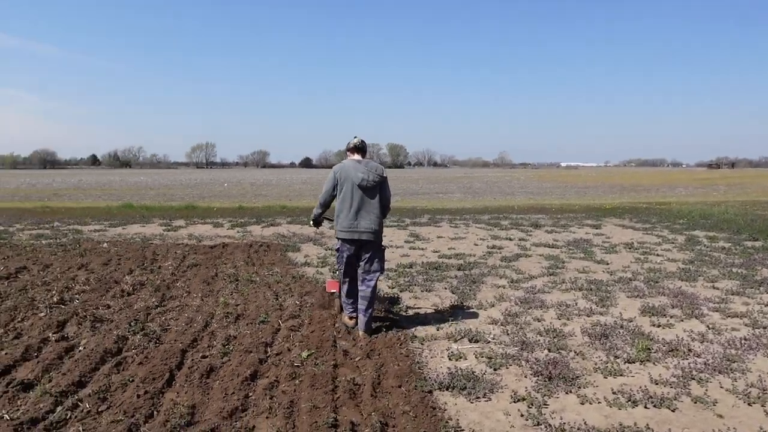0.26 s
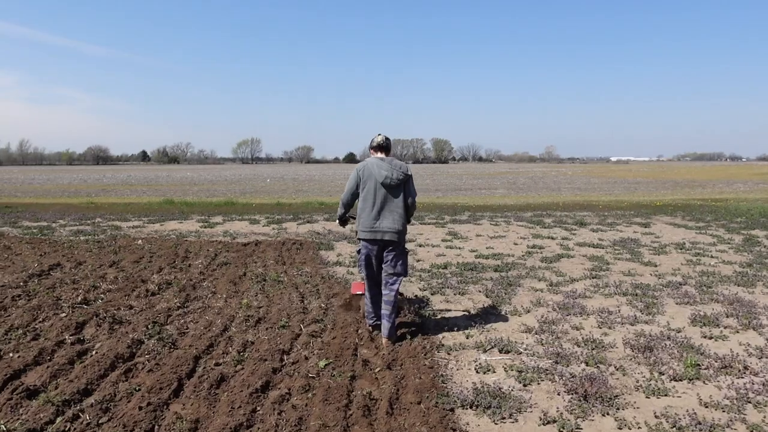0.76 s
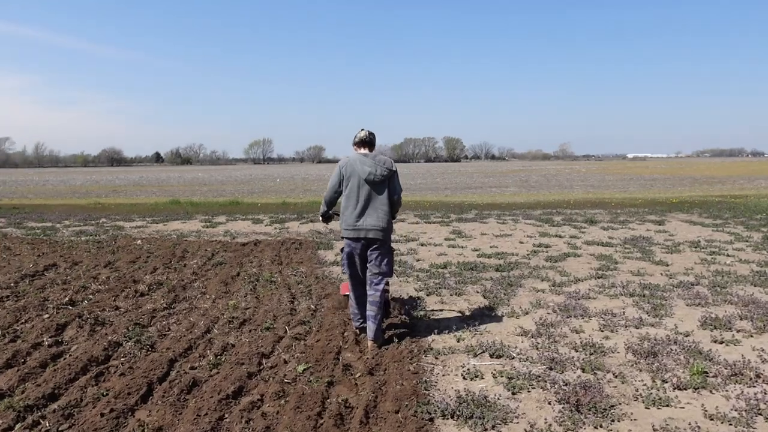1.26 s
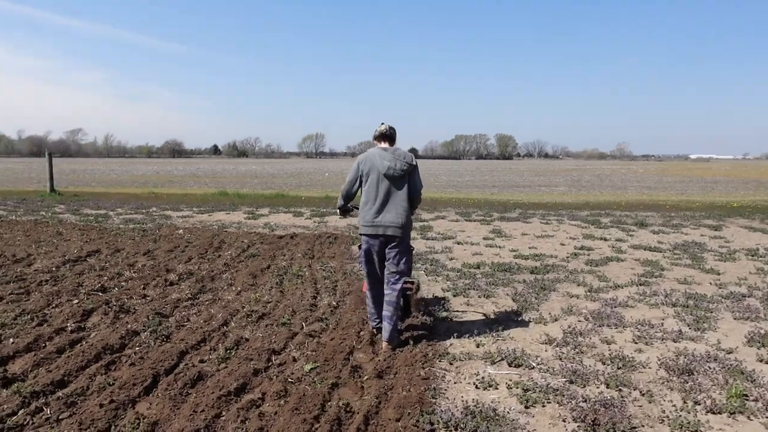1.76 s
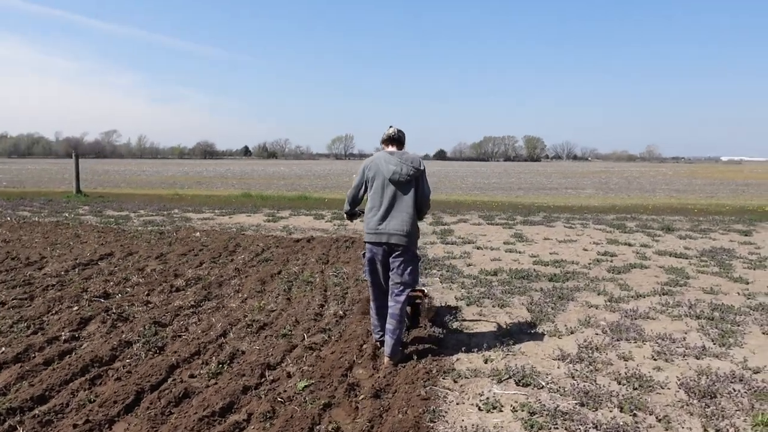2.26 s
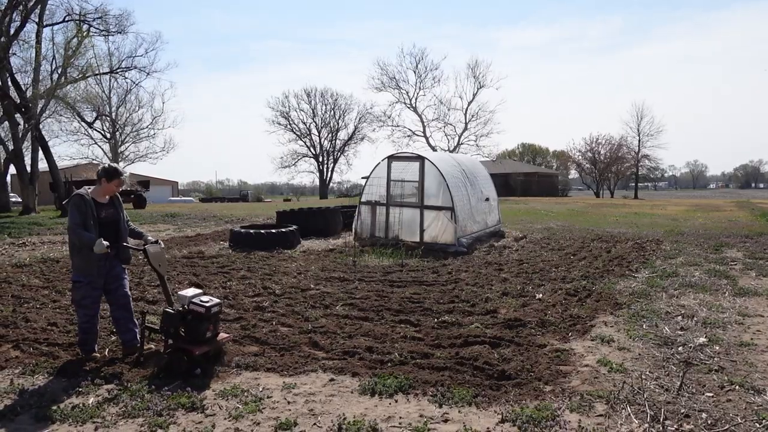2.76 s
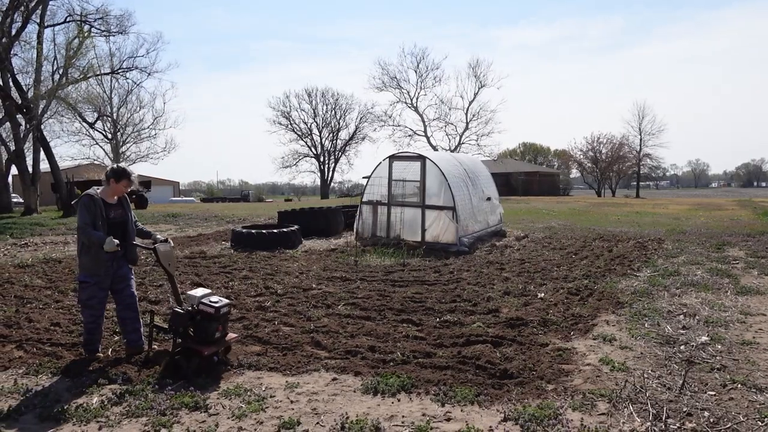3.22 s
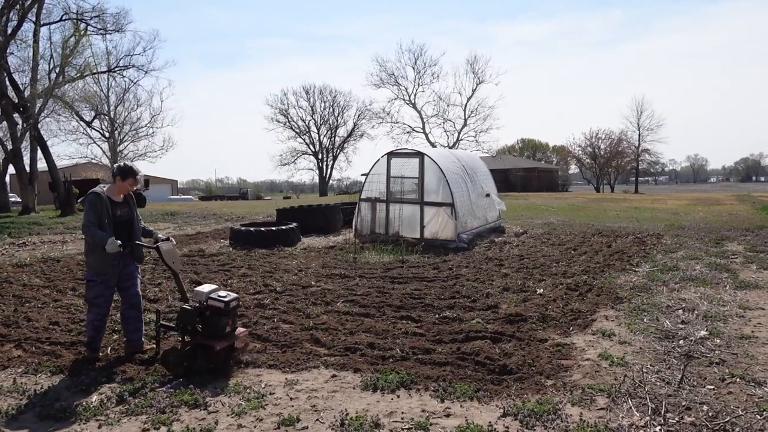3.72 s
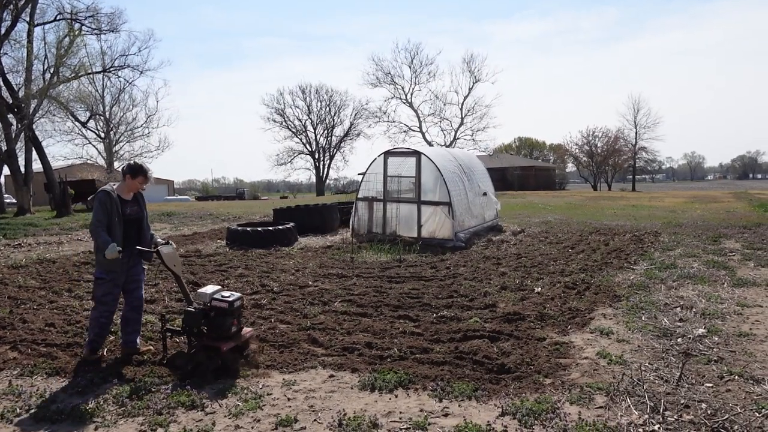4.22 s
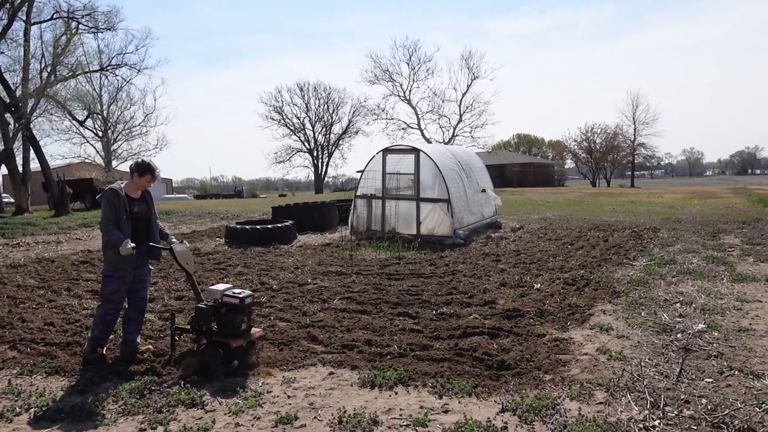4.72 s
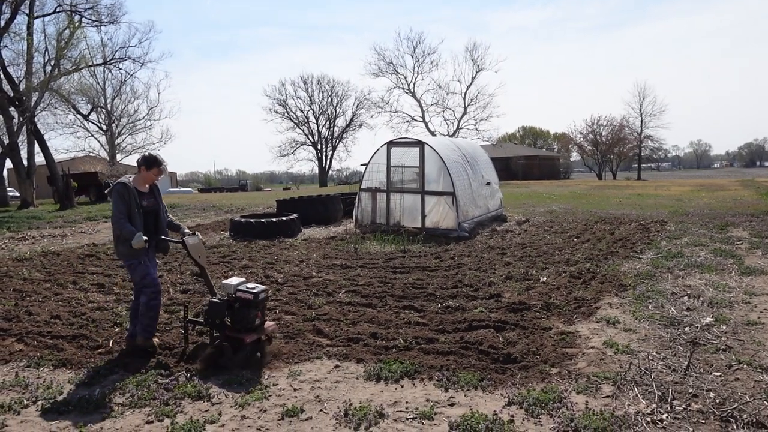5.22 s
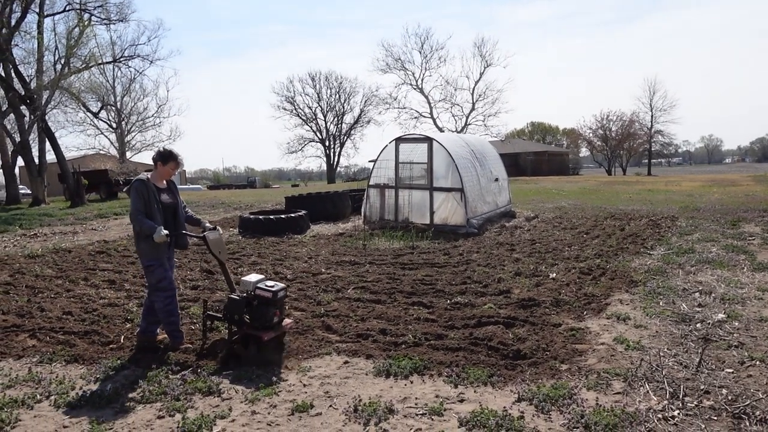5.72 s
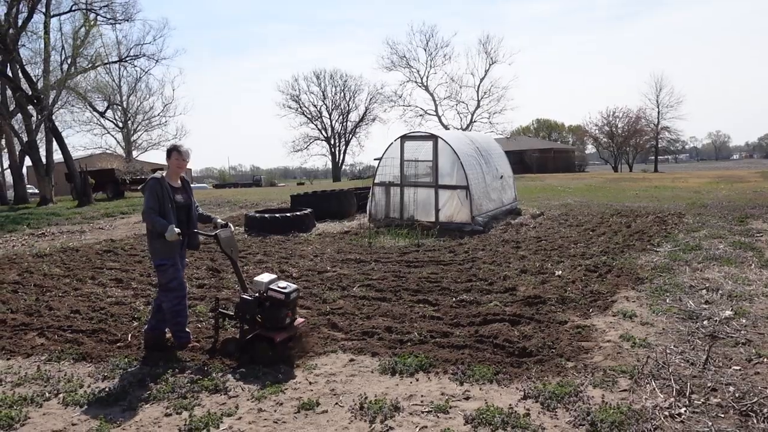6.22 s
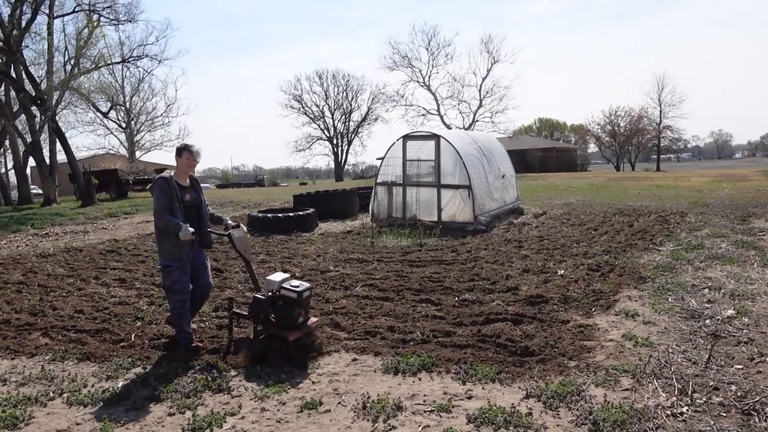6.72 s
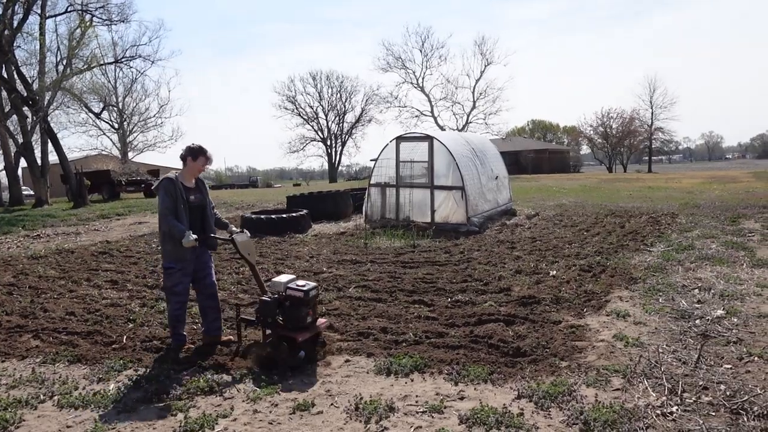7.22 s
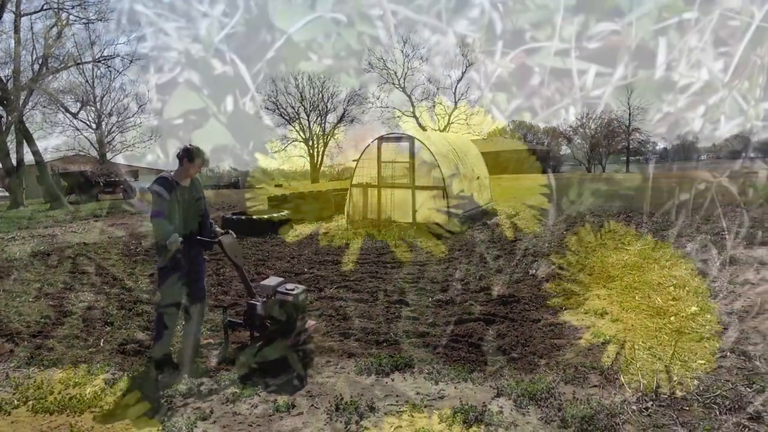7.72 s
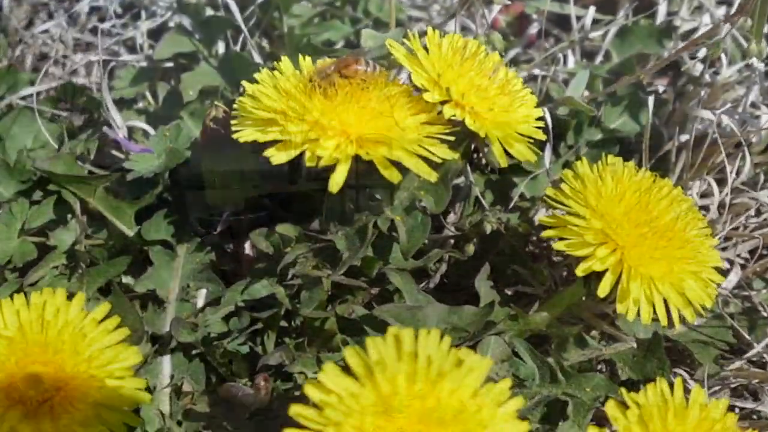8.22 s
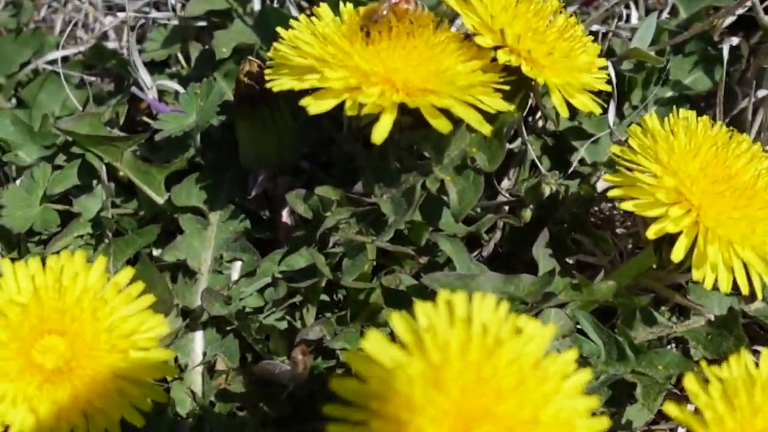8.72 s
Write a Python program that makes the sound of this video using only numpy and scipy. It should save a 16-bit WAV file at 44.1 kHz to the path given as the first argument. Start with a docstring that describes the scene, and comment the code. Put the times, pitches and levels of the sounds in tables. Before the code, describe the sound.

From the first moment a small single-cylinder four-stroke tiller is already running outdoors, heard from several metres away. Its exhaust thumps about twenty-four times a second, a dry, quick putter over dull ground rumble, with ringing metal casing and a subdued hiss. Small misfires near 0.2, 0.7 and 1.0 seconds make it stumble and the speed swing slightly. From about 1.1 seconds it fades, gone by 2.5. It then rises rapidly, full by 3.0 seconds, from a nearer microphone: louder, brighter, with more hiss, chain and valve ticking, gritty knocks and loose-part rattle. It runs steadily, leaning slightly left, with occasional hiccups around 3.1, 3.9, 5.1 and 6.2 seconds and more frequent ones from 7 seconds. From about 7.5 seconds it fades smoothly, reaching complete silence at 8.4, which lasts to the end.

```python
"""A small engine's quick thumping comes first, with clatter and hiss: a single-cylinder four-stroke tiller in soil.
It is heard from farther off, fades out, fades in from nearer and fades out again, and silence ends the scene.
Each firing rings the muffler; now and then it misfires, and the governor lets the speed swing and settle.
Knocks ring the casing, valve ticks and chain links shape the hiss in step with the crank,
and grit, loose parts and a dull rumble add sounds that do not follow the crank."""
import sys
import numpy as np
from scipy import signal
from scipy.fft import rfft, irfft, next_fast_len
from scipy.io import wavfile
from scipy.ndimage import uniform_filter1d

SR = 44100
rng = np.random.default_rng(int(sys.argv[2]) if len(sys.argv) > 2 else 0)


def put_to_file(sound):
    """Save the sound as 16-bit audio at rate SR, in the file named by the first command-line argument."""
    columns = np.atleast_2d(sound).T  # one column per channel
    safe = np.clip(columns, -1, 1)
    whole_steps = np.round(safe * 32767)
    wavfile.write(sys.argv[1], SR, whole_steps.astype(np.int16))


N = 395577

CUT_S, END_S = 2.5, 8.431   # where the near passage starts and ends
FADE_IN_END_S, FADE_IN_DB_PER_S = 2.984, 123
# Pairs give the far passage, then the near one.
FADE_OUT_S = (1.42, 0.91)
FIRST_BLOWDOWN_S = (.0459, 2.5593)   # a moment at which the exhaust valve opens
BARK_DB = (-19, -19.5)
LINK_DB, GUARD_DB = (-3.5, -4.5), (-10.5, -15)   # chain link clicks, and chain guard against the other treble

GOVERNED_RPM = 2837.6
HUNT_PER_S, HUNT_DECAY_S = 2.168, .338   # swings per second; time for a swing to shrink to 37 percent

MUFFLER_LOW_CUT_HZ, CASING_LOW_CUT_HZ = 109.5, 435
EXHAUST_LOW_CUT_HZ = 55   # thins the deepest part of the exhaust thump
BLOWDOWN_RISE_HZ = 100   # softens the start of each push
# Delays count from the opening of the exhaust valve.
BARK_DELAY_MS, EARLY_PUFF_MS, POP_DELAY_MS = 2.87, 6, 15.6
PUFF_LOW_HZ, PUFF_HIGH_HZ = 75.3, 260
POP_LOW_HZ, POP_HIGH_HZ, POP_DB = 151, 306.4, 0.5   # the strength is that of an ordinary pop

LINKS_PER_CYCLE, LINK_PATCHY_DB = 5.44, 2   # links per two crank turns; slow unevenness of the clicks
PEAK_TOP, CUTOFF_HZ = 0.21, 15730   # height where peaks flatten; top of the treble

# Misfires of the engine. Each row: time in seconds, blowdown in dB, early puff in dB, pop in dB,
# speed lost in rpm (negative means gained).
ENGINE_MISFIRES = [(0.172, -7, 6, 11.5, -22.5), (.722, -2.5, -19, 0, 116), (1.019, -14, 11, 11.5, 111),
                   (1.48, -7, -11, -4, 39), (3.149, -5, -14, 6, 92.5), (3.916, -14, -8, 7.5, 63.5),
                   (5.142, -18.5, 12, 9.5, 31.5), (6.157, -9, -10.5, 5.5, 96.5),
                   (6.96, -2.5, -9.5, 2.5, 93), (7.341, -15, 13.5, 9, 149.5), (7.598, -10, -6, 7.5, 10.5),
                   (8.187, -15, -14, 5, 85.5)]


def from_db(db):
    """Turn decibels into gain."""
    return 10 ** (np.asarray(db) / 20)


def rms_one(x):
    """Scale a sound to an rms level of 1."""
    return x / np.sqrt(np.mean(x ** 2) + 1e-20)


def in_time(rows, t):
    """Read each column of a table as a curve at times t."""
    seconds, *columns = np.transpose(rows)
    return [np.interp(t, seconds, column) for column in columns]


def filtered(x, order, hz, kind):
    """Keep the low, high or middle pitches, as a smooth Butterworth filter does."""
    return signal.sosfilt(signal.butter(order, hz, kind, fs=SR, output="sos"), x)


def colour(x, spectrum, peaks=()):
    """Give x a spectrum with narrow bumps or dips, using a filter that never looks ahead; rms 1."""
    hz = np.linspace(1, SR / 2, 4097)
    at, db = np.transpose(spectrum)
    shape_db = np.interp(np.log(hz), np.log(at), db, left=-80)
    shape_db = uniform_filter1d(shape_db, size=9)
    for centre, width, rise_db in peaks:
        shape_db = shape_db + rise_db / (1 + (2 * (hz - centre) / width) ** 2)
    # Folding the cepstrum puts the filter's energy as early as possible (minimum phase).
    cepstrum = irfft(np.log(from_db(shape_db)))
    cepstrum[1:4096] = 2 * cepstrum[1:4096]
    cepstrum[4097:] = 0
    response = irfft(np.exp(rfft(cepstrum)))
    return rms_one(signal.oaconvolve(x, response)[:len(x)])


def ring(x, hz, t60):
    """Let clicks ring like struck metal: a unit click starts a sine of height 1 that falls 60 dB in t60 seconds."""
    r, w = from_db(-60 / (t60 * SR)), 2 * np.pi * hz / SR
    # The tiny offset keeps the fading numbers from becoming too small to compute quickly.
    return signal.lfilter([0, np.sin(w)], [1, -2 * r * np.cos(w), r * r], x + 1e-18)


def opposed_rings(x, modes):
    """Add up ringing modes, each in opposite phase to its neighbours."""
    return sum((-1) ** k * from_db(db) * ring(x, hz, t60) for k, (hz, db, t60) in enumerate(modes))


def clicks(count, at, sizes):
    """Make a train of one-sample clicks."""
    out, inside = np.zeros(count), (at >= 0) & (at < count)
    np.add.at(out, at[inside], sizes[inside])
    return out


def drift(count, rate):
    """Wander at random, no faster than about rate in Hz, with rms 1."""
    return rms_one(filtered(rng.standard_normal(count), 2, rate, "low"))


def crank_rpm(t):
    """Governed speed: each misfire or jolt knocks it off and a damped swing brings it back."""
    # The tines bite into hard soil or break free.
    # Each row: time in seconds, speed lost in rpm (negative means gained).
    jolts = [(-.204, 269), (1.367, -99), (1.95, -46), (2.506, -98), (3.312, 170), (3.674, 83), (4.561, 65),
             (4.786, 72), (4.962, -58), (5.495, -56)]
    upsets = jolts + [(row[0], row[-1]) for row in ENGINE_MISFIRES]
    rpm = np.full(len(t), GOVERNED_RPM)
    for s, lost_rpm in upsets:
        if (s < CUT_S) == (t[0] < CUT_S):   # each passage has its own upsets
            since = np.maximum(t - s, 0)
            swing = np.exp(-since / HUNT_DECAY_S) * np.cos(2 * np.pi * HUNT_PER_S * since)
            rpm -= (t >= s) * lost_rpm * swing
    return rpm


def exhaust(t, cycles, bark_db):
    """Every second turn gas bursts into the muffler and the rising piston pops after it;
    a misfire weakens the burst, adds a dull puff and changes the pop."""
    # Muffler modes. Each row: pitch in Hz, relative level in dB, time to fall 60 dB in seconds.
    muffler_modes = [(125.8, -2, 0.034), (213, 3.5, 0.047), (286.7, -12.5, 0.2)]
    # Upper muffler modes that bark at each blowdown.
    # Each row: pitch in Hz, relative level in dB, time to fall 60 dB in seconds.
    bark_modes = [(344, -5.5, 0.018), (443, 7.5, 0.021), (557, 7.5, 0.048), (774, -10, 0.035)]
    count = len(t)
    at = np.flatnonzero(np.diff(np.floor(cycles)))   # the exhaust valve opens
    strength_db, pop_db = np.zeros(len(at)), np.full(len(at), POP_DB)
    puff_db = np.full(len(at), -np.inf)   # no puff unless it misfires
    for s, *levels_db, _ in ENGINE_MISFIRES:
        if t[0] <= s < t[-1]:
            k = np.argmin(abs(t[at] - s))
            strength_db[k], puff_db[k], pop_db[k] = levels_db

    push = filtered(clicks(count, at, from_db(strength_db)), 2, BLOWDOWN_RISE_HZ, "low")
    thumps = filtered(opposed_rings(push, muffler_modes), 4, MUFFLER_LOW_CUT_HZ, "high")

    puffs = clicks(count, at + int(EARLY_PUFF_MS * SR / 1000), from_db(puff_db))
    puffs = filtered(puffs + 1e-18, 2, [PUFF_LOW_HZ, PUFF_HIGH_HZ], "band")
    pops = clicks(count, at + int(POP_DELAY_MS * SR / 1000), -from_db(pop_db))
    pops = filtered(pops + 1e-18, 2, [POP_LOW_HZ, POP_HIGH_HZ], "band")

    crack = clicks(count, at + int(BARK_DELAY_MS * SR / 1000), from_db(strength_db))
    bark = opposed_rings(crack, bark_modes)
    whole = rms_one(thumps) + from_db(37.0) * (puffs + pops) + from_db(bark_db) * rms_one(bark)
    return filtered(whole, 2, EXHAUST_LOW_CUT_HZ, "high")


def rumble(count):
    """Dull rumble of tines and ground: steady noise coloured low."""
    # Colour of the rumble. Each row: pitch in Hz, relative level per Hz in dB.
    rumble_colour = [(25, -42), (50, -26), (80, -12), (130, 0), (250, 0), (350, -8), (420, -80)]
    return from_db(-16.5) * colour(rng.standard_normal(count), rumble_colour)


def contacts(cycles, table, slack_deg, uneven_db):
    """Find when parts meet, a little early or late, and how hard: slack makes the timing uneven, and a separate
    unevenness varies the strength."""
    degrees, db = np.transpose(table)
    turn = np.arange(np.floor(cycles[0]) - 1, cycles[-1])[:, None]   # whole 720-degree cycles
    slack = slack_deg * rng.standard_normal((len(turn), len(degrees)))
    place = turn + (degrees + slack) / 720
    at = np.interp(place, cycles, np.arange(len(cycles)), left=-1, right=-1).astype(int)
    sizes = from_db(db + uneven_db * rng.uniform(-0.91, 1, place.shape))
    return at.ravel(), sizes.ravel()


def shaken(count, at, sizes, t60, depth):
    """Noise that swells at each contact and dies away, over a steady part."""
    burst = signal.lfilter([1], [1, -from_db(-60 / (t60 * SR))], clicks(count, at, sizes))
    return (1 + depth * burst) * rng.standard_normal(count)


def casing(count, at, knocks, k):
    """Knocks and shaking ring the casing's modes, over a broad roar that throbs with them."""
    # Casing and sheet-metal modes.
    # Each row: pitch in Hz, relative level in dB, time to fall 60 dB in seconds.
    casing_modes = [(745, -3, 0.1), (854.4, -3.5, 0.14), (947, -8.5, 0.16), (992, -7, 0.082),
                    (1046, -1.5, 0.12), (1083, 0, 0.081), (1163, 3, 0.071), (1205, -7, 0.096),
                    (1310, 1, 0.055), (1450, 0, 0.05), (1625, -6.5, 0.063)]
    # Colour of the roar, far and near. Each row: pitch in Hz, relative level per Hz in dB.
    roar_colours = ([(180, -37), (300, -1.5), (366, -15), (580, -15), (741, -8), (1090, -2.5), (1780, -12),
                    (2210, -9.5), (2600, -17.5), (3380, -22.5), (5720, -120)], [(180, -17), (300, -14.5),
                    (353, -13), (493, -13), (714, -9), (903, -7), (1050, -1), (1780, -10.5), (2600, -19.5),
                    (3380, -20), (5720, -120)])
    struck = shaken(count, at, knocks, t60=0.014, depth=1.0) + from_db(26.0) * clicks(count, at, knocks)
    # The level of each mode wanders slowly.
    rings = sum(from_db(db + 1.0 * drift(count, 5.6)) * ring(struck, hz, t60) for hz, db, t60 in casing_modes)
    rings = filtered(rings, 2, CASING_LOW_CUT_HZ, "high")
    roar = colour(shaken(count, at, knocks, t60=0.027, depth=0.93), roar_colours[k])
    return rms_one(from_db(-2.5) * rms_one(rings) + roar)


def links(cycles, level_db):
    """Chain links drop onto the sprocket in step with the crank: when, and how hard."""
    at = np.flatnonzero(np.diff(np.floor(cycles * LINKS_PER_CYCLE)))
    patchy_db = LINK_PATCHY_DB * drift(len(cycles), 6)[at]
    return at, from_db(level_db + patchy_db + 3.0 * rng.standard_normal(len(at)))


def grit(count, per_s, spread_db):
    """Small hard knocks, as of soil and stones on metal: random clicks of very uneven size."""
    sizes = from_db(spread_db * np.minimum(rng.exponential(1, count), 5)) * rng.choice([-1, 1], count)
    return rms_one(sizes * (rng.random(count) < per_s / SR))


def rattle(count, spectrum, bumps, per_s, t60):
    """Many small loose parts, knocked at random; each pings at its own pitch and comes and goes on its own."""
    knocks = grit(count, per_s, 3.4)
    pitches = np.geomspace(1900, 15000, num=44)
    dealt = rng.integers(0, 44, count)   # which part each knock hits
    looseness_db = 4 * uniform_filter1d(rng.standard_normal((44, count // 2000 + 1)), size=3)
    pings = np.zeros(count)
    for k, hz in enumerate(pitches):
        looseness = from_db(np.repeat(looseness_db[k], repeats=2000)[:count])
        pings += ring(knocks * (dealt == k) * looseness, hz, t60) * np.sqrt(hz)
    return colour(pings, spectrum, bumps)


def treble(count, at, ticks, k):
    """Fan and exhaust hiss swells with valve and chain clicks, grit joins in, and loose parts rattle."""
    # Colour of the hiss, far and near. Each row: pitch in Hz, relative level per Hz in dB.
    hiss_colours = ([(1060, -21), (1800, -10.5), (2220, -4), (2800, -0.5), (3420, -1.5), (4170, -3),
                    (5520, -3), (6200, -9), (7370, -13.5), (9840, -15), (15600, -34)], [(1060, -19),
                    (1800, -4.5), (2300, 0), (2750, -4), (3330, 0), (4360, -4), (4770, -5), (6090, -7.5),
                    (6790, -11), (11800, -23), (15600, -33.5)])
    # Narrow bumps and dips in the colour of the hiss, far and near.
    # Each row: pitch in Hz, width in Hz, rise in dB (negative is a dip).
    hiss_bumps = ([(3360, 180, 6.5), (3820, 80, 5.5), (5200, 170, -5.5), (5830, 84, 0.5),
                  (8640, 140, -1.5)], [(3340, 250, -2), (3820, 170, 1), (4820, 250, 5), (5450, 130, 2.5),
                  (5870, 92, -4.5)])
    source = rms_one(shaken(count, at, ticks, t60=0.019, depth=2.6)) + from_db(-12) * grit(count, 1200, 4.2)
    top = filtered(source, 4, 6500, "high")
    # The top of the treble flickers on its own.
    source = source * from_db(0.5 * drift(count, 8.4)) + top * (from_db(2.0 * drift(count, 25)) - 1)
    hiss = colour(source, hiss_colours[k], hiss_bumps[k])
    loose = rattle(count, hiss_colours[k], hiss_bumps[k], per_s=1300.0, t60=.03)
    return rms_one(hiss + from_db(-5) * loose)


def guard(count, at, sizes):
    """Each link rings the chain guard, every mode with a chance strength of its own."""
    # Chain guard modes. Each row: pitch in Hz, relative level in dB, time to fall 60 dB in seconds.
    guard_modes = [(4860, -9, 0.016), (5440, 5, 0.021), (6060, 5, 0.03)]
    shape = (len(at), len(guard_modes))
    chance = rng.uniform(0.48, 1, shape) * rng.choice([-1, 1], shape)
    return rms_one(sum(ring(clicks(count, at, from_db(db) * sizes * chance[:, k]), hz, t60)
                       for k, (hz, db, t60) in enumerate(guard_modes)))


def stereo(mid, pan_db, k):
    """Each pitch leans left or right by its share of the level difference."""
    # Lean by pitch, far and near.
    # Each row: pitch in Hz, share of the left-right difference (negative leans the other way).
    balance_shares = ([(100, 1.05), (1500, 1.06), (2200, 0.67), (3000, .5), (4000, 1.1), (4600, .1),
                      (8800, 0.01), (9500, -.9), (10400, 0.01)], [(100, 1.2), (350, 1.2), (520, .1),
                      (800, 1.2), (1100, 0), (1800, 0), (2200, 1.1), (2700, 0), (3600, -.8), (4700, 0),
                      (5700, 1.3), (6500, 0), (8800, 0), (9500, -2.2), (10400, 0)])
    hz, share = np.transpose(balance_shares[k])
    size = next_fast_len(len(mid))
    share_by_pitch = np.interp(np.arange(size // 2 + 1) * SR / size, hz, share)
    leaning = irfft(rfft(mid, size) * share_by_pitch, size)[:len(mid)]
    side = np.log(10) / 40 * pan_db * leaning   # small dB differences become a side signal
    return np.array([mid + side, mid - side])


def passage(k, t):
    """The tiller heard from one distance (k: 0 far, 1 near): all parts follow one crank."""
    # Level and place at the start and end of the far and near passages. Each row: time in seconds,
    # thump gain in dB, casing gain in dB, treble gain in dB, left minus right in dB before the share by pitch.
    placing = ([(0, -37.2, -38, -44, -1.37), (2.5, -37, -37.5, -47.5, -1.75)],
               [(2.5, -37, -35, -37.5, -1.03), (8.43, -37.5, -33.5, -37, -1.82)])
    # Knocks on the casing in each two-turn cycle as they reach the ear, far and near.
    # Each row: crank angle after the exhaust opens in degrees, strength in dB.
    knock_angles = ([(25, -6.5), (135, -2), (205, -3), (265, -12.5), (335, -1.5), (460, -6), (620, -1),
                    (705, 0)], [(30, -3.5), (140, -14), (235, -11), (310, -6.5), (420, -10.5), (590, 0.5),
                    (670, 0.5)])
    # Ticks of the valve gear in each two-turn cycle as they reach the ear, far and near.
    # Each row: crank angle after the exhaust opens in degrees, strength in dB.
    tick_angles = ([(48, 2), (205, -6), (255, -1), (335, -2.5), (480, -9), (705, -8.5)], [(52, -3),
                   (195, -4), (270, -8.5), (335, -14.5), (468, -5.5), (700, -5)])
    count = len(t)
    cycles = np.cumsum(crank_rpm(t)) / 120 / SR   # one cycle is two turns
    cycles = cycles - np.interp(FIRST_BLOWDOWN_S[k], t, cycles)
    thump_db, casing_db, treble_db, pan_db = in_time(placing[k], t)

    crank_shake = from_db(-38) * np.sin(4 * np.pi * cycles)   # once per turn
    thump = exhaust(t, cycles, BARK_DB[k]) + rumble(count) + crank_shake

    at, knocks = contacts(cycles, knock_angles[k], slack_deg=5.0, uneven_db=4.0)
    body = casing(count, at, knocks, k)

    tick_at, ticks = contacts(cycles, tick_angles[k], slack_deg=8.0, uneven_db=1.5)
    link_at, link_sizes = links(cycles, LINK_DB[k])
    high = treble(count, np.concatenate([tick_at, link_at]), np.concatenate([ticks, link_sizes]), k)
    high = high + from_db(GUARD_DB[k]) * guard(count, link_at, link_sizes)

    mid = from_db(thump_db) * thump + from_db(casing_db) * body + from_db(treble_db) * high
    closing = np.sin(np.pi / 2 * np.clip((t[-1] - t) / FADE_OUT_S[k], 0, 1))
    return closing * stereo(mid, pan_db, k)


def scene():
    """The far passage, the near passage fading in, then silence."""
    t = np.arange(N) / SR
    cut, end = int(CUT_S * SR), int(END_S * SR)
    opening = from_db(FADE_IN_DB_PER_S * np.minimum(t[cut:end] - FADE_IN_END_S, 0))
    far, near = passage(0, t[:cut]), opening * passage(1, t[cut:end])
    return np.hstack([far, near, np.zeros((2, N - end))])


def record(dry):
    """Peaks are rounded softly, then the top of the treble is cut steeply."""
    rounded = PEAK_TOP * np.tanh(dry / PEAK_TOP)
    return signal.sosfilt(signal.ellip(12, .5, 70, CUTOFF_HZ, fs=SR, output="sos"), rounded)


dry = scene()
out = record(dry)
put_to_file(out)
```